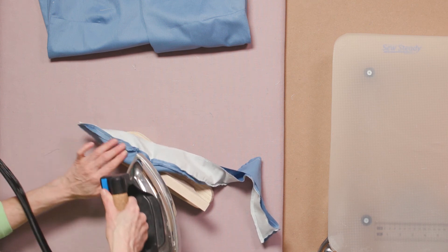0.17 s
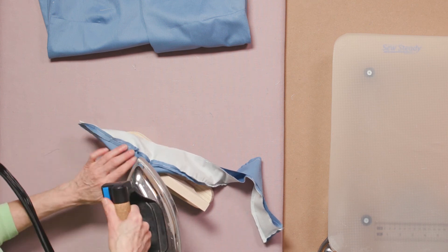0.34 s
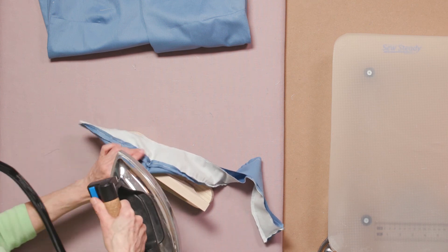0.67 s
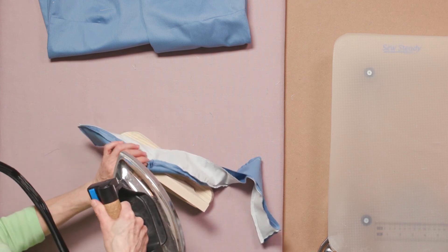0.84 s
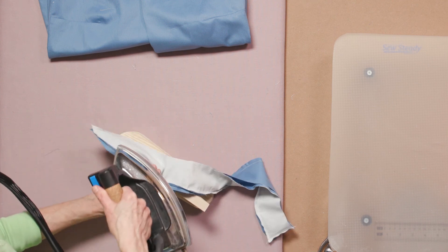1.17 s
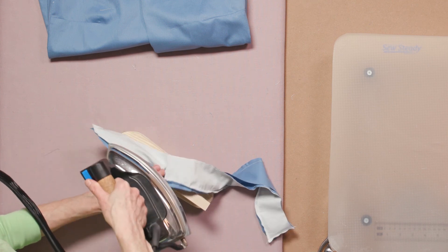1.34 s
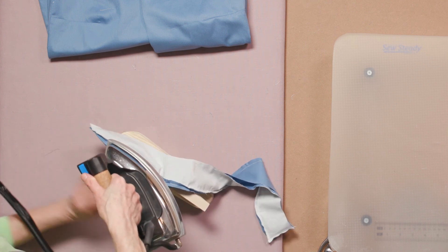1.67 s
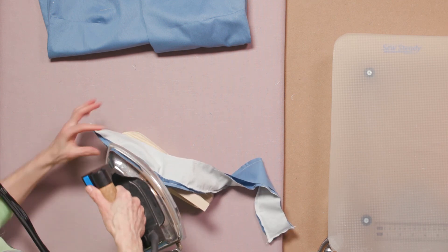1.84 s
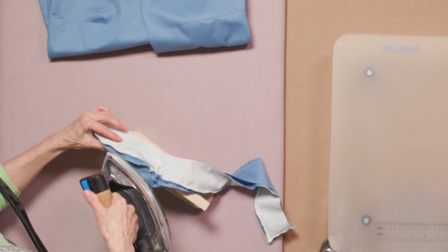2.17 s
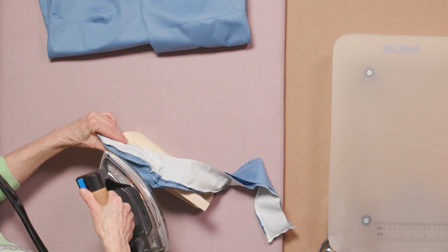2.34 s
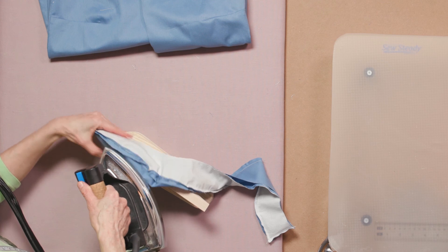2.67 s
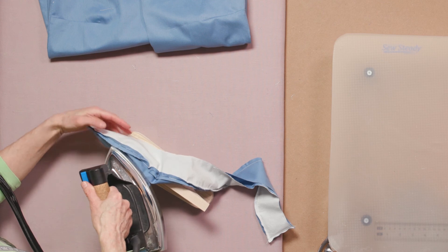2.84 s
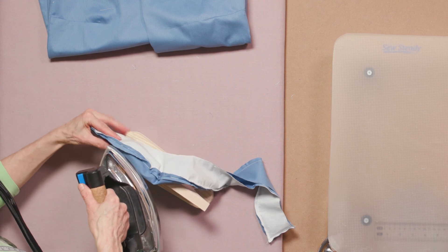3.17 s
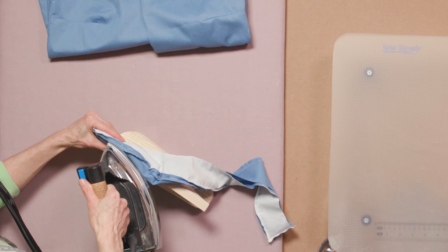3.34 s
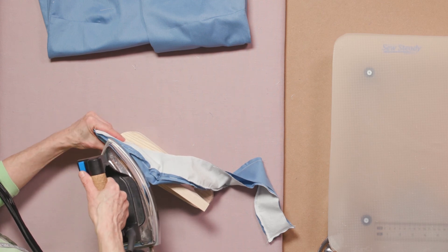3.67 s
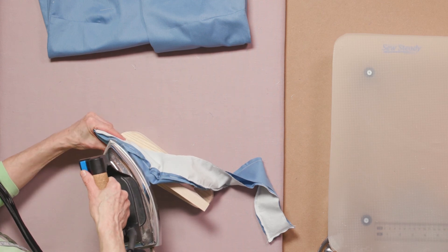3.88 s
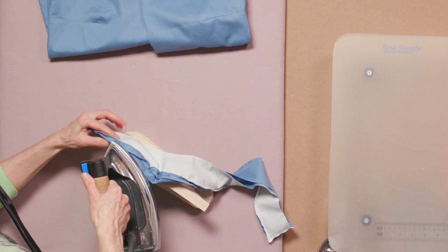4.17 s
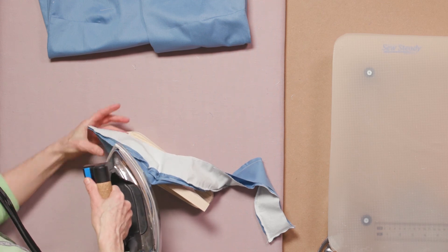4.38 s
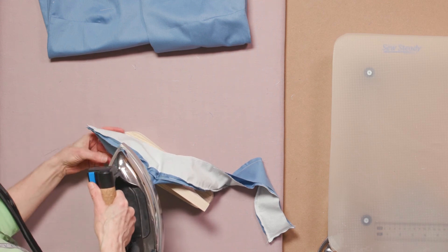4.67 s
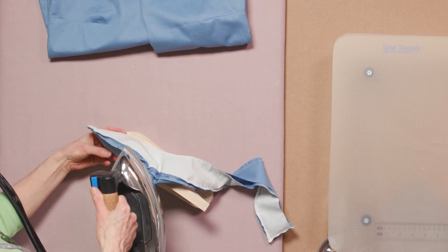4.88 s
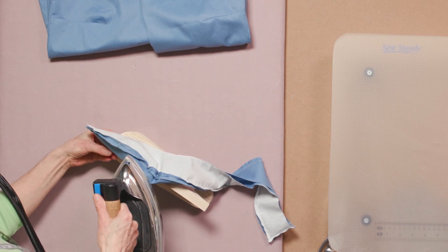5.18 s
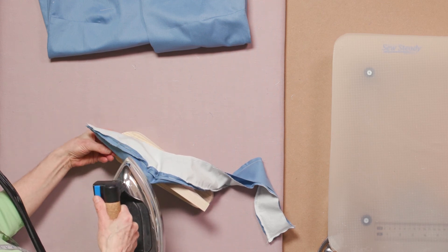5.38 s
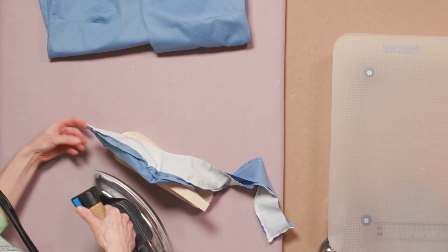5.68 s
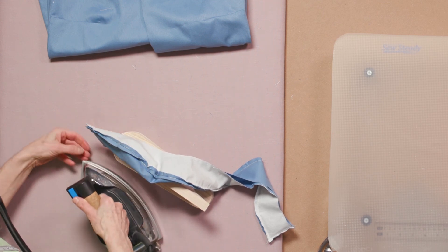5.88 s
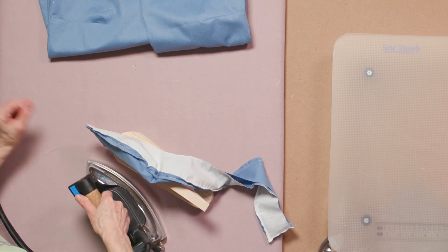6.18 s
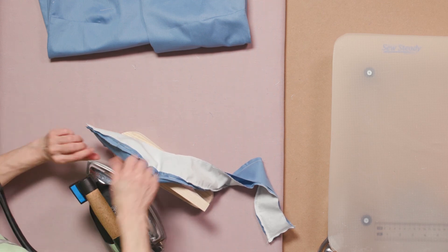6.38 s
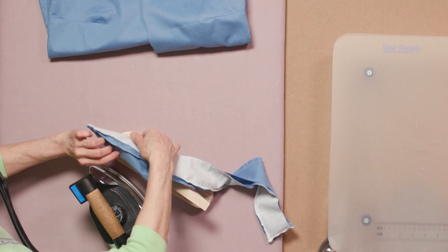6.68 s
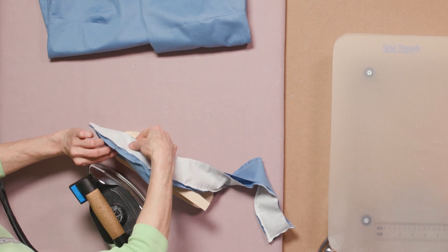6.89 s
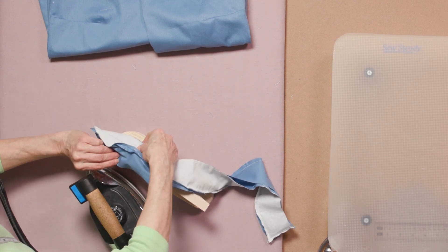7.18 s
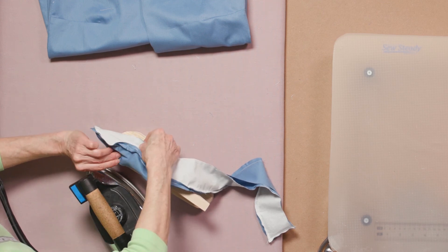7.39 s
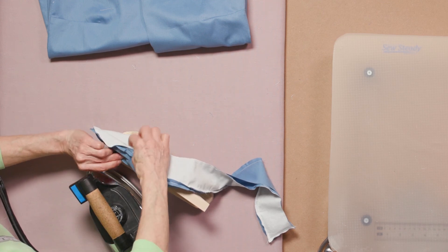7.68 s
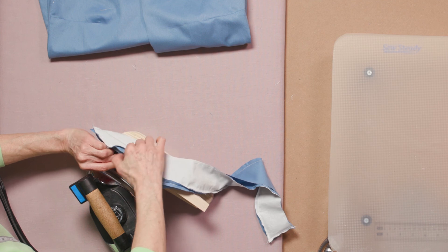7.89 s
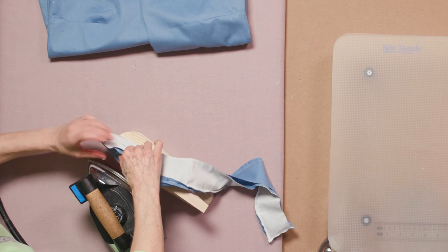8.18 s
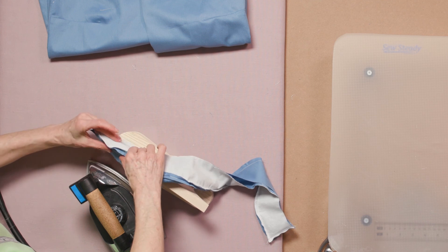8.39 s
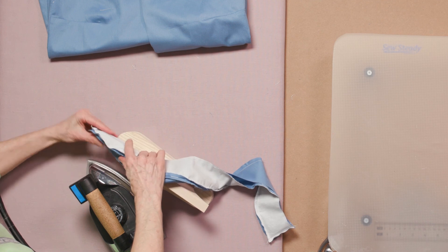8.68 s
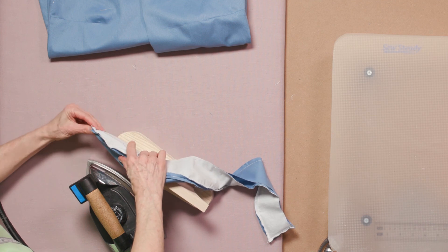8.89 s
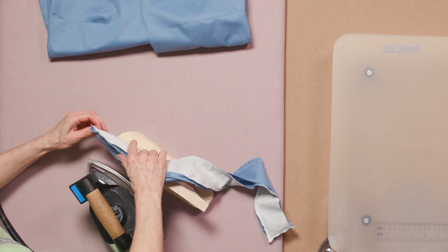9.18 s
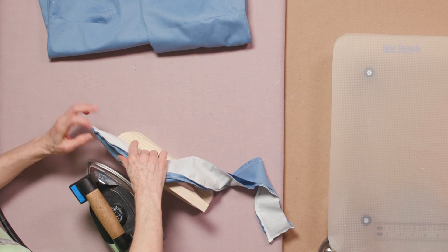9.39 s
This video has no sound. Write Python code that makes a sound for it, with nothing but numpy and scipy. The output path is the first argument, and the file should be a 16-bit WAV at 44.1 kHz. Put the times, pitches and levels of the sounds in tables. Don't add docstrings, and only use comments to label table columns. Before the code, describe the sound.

Fingers and a hand iron softly rub cloth on a padded form, with light ticks and one heavy set-down clunk, over a low steady hum.

```python
import sys
import numpy as np
from scipy import signal
from scipy.fft import rfft, irfft
from scipy.io import wavfile
from scipy.ndimage import uniform_filter1d

SR = 44100
rng = np.random.default_rng(int(sys.argv[2]) if len(sys.argv) > 2 else 0)


def bounce(signal):
    frames = np.transpose(np.atleast_2d(signal))
    limited = np.clip(frames, -1, 1)
    pcm = np.round(limited * 32767).astype(np.int16)
    wavfile.write(sys.argv[1], SR, pcm)


def how_loud(loudness_db):
    steps = np.asarray(loudness_db, float) / 20
    return 10 ** steps


N = 420273
TIME = np.arange(N) / SR

# [f/Hz, spectral density level/dB]
FIBRE_SPECTRUM = [(290, -9), (500, -6), (640, -10), (1160, -7), (1260, -12.5), (1530, -6), (1670, -11.5),
                  (4600, -9), (8700, -6), (16000, -12)]
# [peak t/s, rise t/s, fall t/s, rustle level/dB]
FINGERS = [(.0, .01, 0.081, -66.5), (.09, .06, 0.07, -68.5), (.28, 0.076, 0.071, -67),
           (.37, .05, 0.067, -69.5), (.46, 0.097, 0.12, -66), (.61, 0.045, 0.038, -67.5),
           (.84, 0.063, 0.05, -70), (2.07, 0.055, .04, -74), (2.215, 0.027, 0.022, -71),
           (6.93, 0.085, 0.12, -68.5), (7.21, 0.096, 0.072, -60.5), (7.31, 0.042, 0.065, -62),
           (7.435, .03, 0.024, -68.5), (7.57, 0.11, .1, -74), (7.635, 0.028, 0.018, -63.5),
           (7.71, 0.038, 0.034, -67.5), (7.79, .05, 0.056, -69), (7.89, 0.023, .03, -71),
           (8.0, 0.085, 0.044, -76), (8.07, 0.041, 0.058, -66), (8.34, 0.019, .05, -72),
           (8.4, .04, .04, -71), (8.54, 0.095, 0.093, -69), (8.68, 0.046, 0.064, -65),
           (9.02, .05, 0.069, -90), (9.3, 0.24, 0.2, -76)]
# [peak t/s, rise t/s, fall t/s, rustle level/dB]
IRON = [(.92, 0.032, .04, -65.5), (1.0, 0.1, 0.11, -61.5), (1.08, 0.068, 0.079, -61.5),
        (1.2, 0.08, 0.19, -69), (1.46, 0.059, 0.15, -66), (1.54, 0.083, 0.079, -68.5),
        (1.88, 0.025, 0.13, -72.5), (2.33, 0.034, .04, -67), (2.39, .03, 0.072, -70),
        (2.59, 0.086, 0.15, -67.5), (2.77, 0.026, 0.038, -70.5), (2.86, 0.08, 0.058, -72.5),
        (3.24, 0.055, 0.086, -69), (3.35, 0.052, 0.044, -64), (3.525, .015, .04, -70.5),
        (3.67, .035, .05, -68), (3.96, 0.033, 0.027, -79), (4.12, 0.086, 0.18, -75),
        (4.34, .025, .025, -70.5), (4.41, .02, 0.024, -71), (4.5, 0.031, .03, -70),
        (4.55, 0.046, 0.047, -67), (4.69, .02, 0.024, -79), (6.327, 0.017, 0.019, -62),
        (6.362, 0.0094, 0.013, -59.5), (6.385, .02, 0.025, -66)]
# [peak t/s, rise t/s, fall t/s, rustle level/dB]
PAD = [
    (5.25, .07, 0.19, -75),
    (5.67, 0.023, 0.12, -70),
    (5.78, .05, .05, -73.5),
    (5.87, 0.077, 0.061, -67),
    (5.97, .02, .04, -67),
    (6.05, .04, 0.047, -63),
    (6.2, 0.12, 0.13, -73),
    (6.82, 0.013, 0.031, -63),
    (6.78, 0.072, .04, -70),
]
# [peak t/s, rise t/s, fall t/s, rustle level/dB]
LINING = [
    (.105, 0.014, .015, -70),
    (8.735, 0.048, 0.047, -69),
    (8.8, .04, 0.087, -74),
]


def sliding():
    grains = rng.standard_normal(N) + 0.73 * slips(1500, scatter_db=1.5)
    rustle = colour(grains, FIBRE_SPECTRUM) * how_loud(0.79 * walk(30))
    high_pass = signal.butter(2, 8800, "high", fs=SR, output="sos")
    fine = signal.sosfiltfilt(high_pass, rustle)
    coarse = rustle - fine
    surfaces = ((FINGERS, -1.2), (IRON, -3), (PAD, -21), (LINING, 3.5))
    creep = how_loud(-85.5 + 3 * walk(6))
    coarse_gain = np.sqrt(sum(strokes(table) ** 2 for table, _ in surfaces) + creep ** 2)
    fine_gain = np.sqrt(sum(strokes(table, fine_db) ** 2 for table, fine_db in surfaces) + creep ** 2)
    return how_loud(6.5) * coarse_gain * coarse + how_loud(6.0) * fine_gain * fine


# [peak t/s, rise t/s, fall t/s, ring level/dB, contact place 0-3]
DRAG = [(.01, .02, .04, -71, 0.11), (.47, 0.14, .12, -76, 2.1), (.61, 0.05, .04, -70, 2.06),
        (.98, 0.065, .05, -71.5, .95), (1.06, 0.063, 0.047, -68, 1.0), (1.29, 0.041, 0.044, -76, 0.3),
        (1.5, 0.028, 0.046, -72, 1.1), (2.33, .03, .04, -72, 0.48), (2.4, 0.037, .04, -74.5, .5),
        (2.58, 0.038, 0.11, -66, 0.5), (2.68, 0.04, 0.05, -70, .6), (2.78, .07, .09, -72, .5),
        (2.915, .02, .015, -73, 1.1), (2.895, 0.025, .012, -68, 0.27), (3.23, 0.026, 0.088, -71, 0.54),
        (3.35, .05, .04, -65.5, 0.51), (3.53, .025, .05, -70.5, 0.48), (3.67, 0.031, 0.043, -69, .7),
        (3.96, .03, 0.026, -77, .3), (4.14, .05, 0.05, -77, 0.092), (4.345, .025, 0.022, -76, .1),
        (4.397, 0.008, 0.016, -66, 0), (4.52, 0.044, 0.033, -75, .9), (4.98, .03, 0.036, -73, 0),
        (5.12, .04, .05, -73, 0), (5.23, .05, .025, -73, 0)]
# [peak t/s, rise t/s, fall t/s, ring level/dB, contact place 0-3]
NUDGE = [(.05, 0.098, 0.045, -73, 3.0), (6.818, .005, 0.034, -60.5, 1.9), (6.87, .015, 0.03, -69, 0.0),
         (6.925, 0.04, 0.035, -66, 0.3), (6.93, 0.03, 0.025, -68, 2.5), (7.0, .04, 0.067, -73, 0.5),
         (7.2, .03, .04, -71, .2), (7.205, .015, .015, -70, 2.0), (7.78, .04, .03, -73, 2.7),
         (8.068, .03, .03, -70, 3.0), (8.07, .05, .06, -75, .9), (8.57, .035, .04, -76, 3.0),
         (8.35, .02, .05, -79, 1.5), (8.5, .015, .04, -73, 2), (8.68, 0.038, 0.041, -66.5, 1.3),
         (8.67, .03, .08, -70, 0.0), (8.84, .03, .02, -77, 1.0)]
# [peak t/s, rise t/s, fall t/s, ring level/dB]
HEEL = [(.93, .04, .04, -82), (1.05, .08, .1, -75), (.02, .03, .04, -66), (2.77, 0.03, .04, -75),
        (3.25, 0.03, .04, -69), (3.36, .04, .04, -76), (3.68, 0.035, .04, -70), (4.52, 0.048, .05, -76),
        (6.93, 0.042, 0.054, -69), (7.78, .03, .03, -83), (8.68, .04, .05, -74)]
# [peak t/s, rise t/s, fall t/s, ring level/dB]
RIM = [(.38, .04, .12, -83), (.5, .05, .05, -86), (.63, .04, .02, -76), (1.03, .1, .08, -72),
       (2.33, .03, .04, -77), (2.77, .05, .08, -80), (2.57, .04, .05, -74), (2.66, .03, .04, -74),
       (2.89, .02, .02, -74), (3.25, .05, .06, -76), (3.37, .05, .04, -77), (3.68, .04, .04, -81),
       (8.69, .03, .05, -79)]
# [f/Hz, width f/Hz, level/dB]
PLATE = [
    [(1490, 20, 0), (1560, 120, -14)],
    [(2080, 45, 0), (2420, 80, -11)],
    [(3770, 60, 0), (4100, 500, -13), (8900, 400, -10)],
    [(4670, 110, 0), (4850, 300, -9)],
]
# [f/Hz, width f/Hz, level/dB]
HEEL_MODE = [(1158, 35, 0)]
# [f/Hz, width f/Hz, level/dB]
RIM_MODE = [(3790, 50, 0)]
RING_PLACE = (0.85, 3.35, 2, 0.11)
RING_DB = (0.45, -0.47, -0.39, 0.65)
RING_FADE_DB = (11, 6.8, 5.5, 6.8)
RING_FLUTTER_DB = (1.7, 2.2, 2.2, 2.2, 1.5, 1.8)


def dragging():
    contacts = np.vstack([DRAG, NUDGE])
    gains = []
    for place, db, fade_db in zip(RING_PLACE, RING_DB, RING_FADE_DB):
        loss_db = fade_db * (contacts[:, 4] - place) ** 2
        gains.append(strokes(contacts, db - loss_db))
    gains += [strokes(HEEL), strokes(RIM)]
    out = np.zeros(N)
    for modes, gain, flutter_db in zip(PLATE + [HEEL_MODE, RIM_MODE], gains, RING_FLUTTER_DB):
        ring = steady(unit(body(rng.standard_normal(N), modes)), 0.048)
        out += gain * ring * how_loud(flutter_db * walk(90))
    return out


# [peak t/s, rise t/s, fall t/s, level/dB, f/Hz]
SING = [
    (6.83, .015, 0.051, -62.5, 1494),
    (6.92, 0.036, .05, -70, 1494),
    (7.0, .04, .07, -68, 1494),
    (6.93, .04, 0.028, -70, 2090),
    (6.98, .015, .015, -74, 2080),
    (7.005, .015, .02, -70, 4690),
    (7.045, .015, .02, -76, 5300),
    (7.205, .015, .015, -68, 4690),
    (8.68, .04, .04, -69, 1494),
    (.05, .06, .05, -74, 2090),
]


def singing():
    waver = np.cumsum(1 + 0.00207 * walk(40)) / SR
    flutter = how_loud(1.4 * walk(60))
    lines = sum(np.sqrt(2) * strokes([row]) * np.sin(2 * np.pi * row[4] * waver) for row in SING)
    return flutter * lines


# [peak t/s, rise t/s, fall t/s, level/dB]
SCUFF = [
    (6.818, .005, 0.033, -58),
]
# [f/Hz, width f/Hz, level/dB]
EDGE = [(2400, 500, -6), (3700, 500, 1), (4300, 500, -1.5)]


def scuffing():
    return scrape(EDGE, SCUFF)


# [peak t/s, rise t/s, fall t/s, level/dB]
TAUT = [
    (1.28, .04, .04, -76),
    (1.45, .04, .05, -67),
    (1.52, .04, .05, -72),
    (1.06, .06, .05, -68),
    (7.22, .03, .04, -66),
    (7.435, .02, .02, -71),
    (1.75, .05, .06, -77),
]
# [f/Hz, width f/Hz, level/dB]
WEAVE = [(6600, 300, 0), (7300, 270, -2), (8500, 500, -4)]


def whispering():
    return scrape(WEAVE, TAUT)


# [f/Hz, peak level/dB, t60 t/s, sign]
SNAP_SOFT = [(2100, -54, .009, 1), (3750, -48, .007, 1), (4400, -50, .004, -1), (5020, -47.5, .008, 1),
             (5900, -58, .006, 1)]
# [f/Hz, peak level/dB, t60 t/s, sign]
SNAP_HARD = [(2100, -48, .007, 1), (3000, -42, .004, 1), (3850, -45, .005, -1), (5800, -42, .004, -1),
             (7100, -36, .003, -1), (8700, -42, .003, 1), (10400, -45, .0035, 1), (12700, -49, .003, 1)]


def snaps():
    out, t = np.zeros(N), TIME[:SR // 20]
    for s, modes in ((1.5813, SNAP_SOFT), (1.8587, SNAP_HARD)):
        onset = 1 - np.exp(-t / 0.000056)
        ring = sum(sign * how_loud(db) * np.sin(2 * np.pi * hz * t) * decay(t, t60) for hz, db, t60, sign in modes)
        add(out, s, ring * onset)
    return out


# [t/s, peak level/dB, low f/Hz, high f/Hz, high share level/dB]
TICKS = [(0.048, -49, 2100, 8720, -2), (0.4385, -45, 1500, 6000, 9), (1.23, -49, 3200, 7470, 4),
         (1.2672, -53, 4700, 8500, 4), (1.3031, -48, 4700, 8500, 4), (1.8244, -52, 2530, 5500, 8),
         (1.865, -55, 2800, 7000, 10), (3.2108, -49, 1454, 5620, 15), (4.3899, -56, 1580, 5050, 16),
         (5.904, -47, 6500, 9500, 10), (5.9602, -51, 3500, 6000, 2), (5.9723, -47, 5000, 8000, 8),
         (6.0647, -43, 2200, 4930, -16), (6.3205, -39, 4300, 8300, 6), (6.3276, -33.5, 4400, 8300, 14),
         (6.3427, -41, 1550, 7630, 14), (6.3576, -47, 1400, 6970, 9), (6.3663, -38, 1490, 8000, 18),
         (6.3703, -37, 1497, 10400, 17), (6.726, -44, 2000, 4400, -9), (7.25, -45, 4500, 9000, 8),
         (6.8145, -51, 3300, 8430, -6), (8.329, -52, 1980, 7250, 17), (9.39, -44.5, 3150, 8040, 12)]


def ticks():
    out, t = np.zeros(N), TIME[:SR // 10]
    noises = rng.standard_normal((len(TICKS), len(t)))
    for (s, db, low_hz, high_hz, high_db), noise in zip(TICKS, noises):
        strike = (t == 0) + how_loud(-16) * noise * decay(t, 0.011)
        low = band(band(strike, low_hz, 0.5 * low_hz), low_hz, 1.0 * low_hz)
        high = band(band(strike, high_hz, 0.71 * high_hz), high_hz, 0.72 * high_hz)
        crack = 3 * low - how_loud(high_db) * high
        add(out, s + 0.00067, how_loud(db) * crack / abs(crack).max())
    return out


# [t/s, peak level/dB, f/Hz, t60 t/s]
PATS = [
    (0.048, -47, 490, 0.018),
    (0.122, -55, 760, 0.02),
    (0.292, -52, 751, 0.025),
    (0.371, -49, 573, 0.025),
    (0.391, -54, 490, 0.02),
    (0.415, -48.5, 600, 0.025),
    (0.438, -47, 606, 0.025),
    (0.464, -52, 452, 0.028),
    (0.509, -65, 482, 0.014),
    (5.887, -62, 468, 0.03),
]


def pats():
    return mode_pairs(PATS, push_s=0.00064, spread=1.28)


# [t/s, peak level/dB, f/Hz, t60 t/s]
CLACKS = [(0.0014, -51, 1154, 0.054), (0.392, -57, 1100, .015), (0.414, -57, 1000, .015),
          (0.439, -54, 1500, .015), (6.3215, -49, 1450, 0.027), (6.328, -46, 1600, 0.027),
          (6.343, -54, 1500, .04), (6.378, -49, 1480, .06), (0.3194, -51, 1580, 0.016),
          (0.344, -55, 1740, 0.03), (4.6896, -59, 1130, 0.028), (4.69, -63, 2490, 0.035),
          (5.6665, -58, 2510, 0.046), (6.0327, -49, 1420, 0.023), (6.3692, -40.5, 1524, 0.037),
          (6.7262, -46, 1150, 0.018), (4.503, -58, 1200, .03), (4.508, -58, 2100, .02),
          (6.814, -52, 1494, 0.086), (8.488, -58, 2000, 0.05)]


def clacks():
    return mode_pairs(CLACKS, push_s=0.00056, spread=0.76)


# [t/s, peak level/dB, f/Hz, t60 t/s]
KNOCKS = [
    (6.066, -31, 270, 0.021),
    (6.329, -47, 346, 0.083),
    (6.369, -37, 343, 0.06),
    (6.372, -49.5, 685, 0.057),
]


def knocks():
    return mode_pairs(KNOCKS, push_s=0.0019, spread=1.2)


# [peak t/s, rise t/s, fall t/s, level/dB]
RATTLE = [
    (5.71, .04, .05, -71),
    (6.058, 0.16, 0.069, -71.5),
    (6.19, 0.023, 0.095, -72.5),
    (6.322, 0.0028, 0.02, -59.5),
    (6.368, .004, 0.02, -54),
    (6.386, .01, 0.018, -58),
    (6.41, .03, .05, -71),
]
# [f/Hz, width f/Hz, level/dB]
SHELL = [(1150, 200, -4.5), (1400, 94, 2), (1580, 130, -2.5), (1740, 100, -1), (3300, 840, -12)]


def rattling():
    return scrape(SHELL, RATTLE)


# [peak t/s, rise t/s, fall t/s, level/dB]
GRIT = [
    (6.359, 0.0032, .006, -55),
    (6.367, .003, .003, -48.5),
    (6.370, .002, 0.0036, -49.5),
    (6.385, .01, .025, -61),
]
# [f/Hz, width f/Hz, level/dB]
GRAIN = [(3420, 1500, -6), (6900, 1700, -1), (8700, 1300, 1), (10800, 2000, -5)]


def crunching():
    return unit(body(slips(4000, scatter_db=1.5), GRAIN)) * strokes(GRIT)


# [peak t/s, rise t/s, fall t/s, level/dB]
SHIFT = [
    (7.26, .1, .12, -73),
    (8.497, 0.013, .05, -56.5),
    (8.56, 0.047, 0.052, -56.5),
    (8.64, .04, 0.066, -63.5),
    (8.72, 0.055, 0.062, -67.5),
]
# [f/Hz, width f/Hz, level/dB]
FORM = [(490, 40, -1.5), (581, 39, 4), (765, 83, -7), (860, 48, -6), (1950, 71, -16)]


def shifting():
    return scrape(FORM, SHIFT)


# [f/Hz, rms level/dB]
MOTOR = [(86.67, -50), (120.0, -64.5)]


def motor():
    return tones(MOTOR, drift_db=0.27)


# [f/Hz, width f/Hz, rms level/dB]
FAN = [(176.5, 2.5, -70), (234.8, 0.78, -68), (294.5, 2.5, -72.5), (356.6, 16, -79), (435.3, 14, -81.5)]


def fan():
    return sum(how_loud(db) * steady(unit(band(rng.standard_normal(N), hz, w)), 0.25) for hz, w, db in FAN)


# [f/Hz, spectral density level/dB]
AIR = [(5.9, -27), (10, -17), (38, -14), (60, -12.5), (92, -18.5), (111, -10), (138, -9.5), (240, -14.5),
       (394, -25.5), (570, -28.5), (1530, -35), (2360, -38.5), (12100, -43), (16000, -43)]


def air():
    return how_loud(-60.5) * colour(rng.standard_normal(N), AIR)


# [delay t/s, half width t/s, sign, peak level/dB]
THUMP = [
    (0, 0.009, -0.82, -36.5),
    (.064, .013, 0.77, -34),
    (.085, .016, 1, -51),
    (.16, 0.042, -0.67, -46),
]
# [f/Hz, rms level/dB]
RIPPLE = [(7.7, -65), (15.4, -73), (23.1, -99)]


def supply():
    first_s, every_s = 0.153, 3.0647
    since = (TIME - first_s + 1) % every_s - 1
    thump = sum(sign * how_loud(db) * np.exp(-.5 * ((since - d) / w) ** 2) for d, w, sign, db in THUMP)
    return thump + tones(RIPPLE, drift_db=3.5)


def strokes(table, more_db=0):
    edge_db, roundness = 10, 1.37
    power = np.zeros(N)
    for (s, rise, fall, db, *_), extra_db in zip(table, np.broadcast_to(more_db, len(table))):
        span = slice(max(int((s - 5 * rise) * SR), 0), int((s + 5 * fall) * SR))
        away = np.maximum((s - TIME[span]) / rise, (TIME[span] - s) / fall)
        power[span] += how_loud(db + extra_db - edge_db * away ** roundness) ** 2
    return np.sqrt(power)


def scrape(modes, table):
    noise = steady(unit(body(rng.standard_normal(N), modes)), 0.08)
    return noise * how_loud(0.82 * walk(50)) * strokes(table)


def mode_pairs(table, push_s, spread):
    out, t = np.zeros(N), TIME[:SR // 4]
    for s, db, hz, t60 in table:
        pair = np.sin(2 * np.pi * hz * t) + 0.064 * np.sin(2 * np.pi * hz * spread * t)
        push = 1 - np.exp(-t / push_s)
        add(out, s, how_loud(db) * 0.69 * pair * push * decay(t, t60))
    return out


def decay(t, t60):
    return 1000 ** (-t / t60)


def slips(per_s, scatter_db):
    happens, side, size = rng.random((3, N))
    sizes = how_loud(-scatter_db * np.log(size + 0.02))
    return unit((happens < per_s / SR) * (side - .5) * sizes)


def tones(table, drift_db):
    out = np.zeros(N)
    for hz, db in table:
        level = how_loud(db + drift_db * walk(2.1))
        out += level * np.sqrt(2) * np.sin(2 * np.pi * (hz * TIME + rng.random()))
    return out


def steady(x, hold_s):
    return unit(x / np.sqrt(uniform_filter1d(x ** 2, int(hold_s * SR)) + 0.13))


def walk(rate):
    k = int(SR / rate)
    held = np.repeat(rng.standard_normal(N // k + 1), k)
    return unit(uniform_filter1d(uniform_filter1d(held, k), k)[:N])


def body(x, modes):
    return sum((-1) ** k * how_loud(db) * band(x, hz, w) for k, (hz, w, db) in enumerate(modes))


def band(x, hz, width):
    return signal.lfilter(*signal.iirpeak(hz, hz / width, fs=SR), x)


def colour(x, points):
    hz, db = np.transpose(points)
    f = np.maximum(np.arange(N // 2 + 1) * SR / N, 1)
    gain = how_loud(np.interp(np.log(f), np.log(hz), db))
    return unit(irfft(rfft(x) * gain, N))


def unit(x):
    return x / np.sqrt(np.mean(x ** 2))


def add(out, s, burst):
    i = int(s * SR)
    out[i:i + len(burst)] += burst[:N - i]


def scene():
    close = sliding() + dragging() + singing() + scuffing() + whispering() + snaps() + ticks()
    close = close + pats() + clacks() + knocks() + rattling() + crunching() + shifting()
    t = TIME[:SR // 3]
    tail = rng.standard_normal(len(t)) * decay(t, 0.21) * (t > .004)
    wet = signal.fftconvolve(close, tail / np.sqrt(np.sum(tail ** 2)))[:N]
    background = motor() + fan() + air() + supply()
    return (close + how_loud(-12.5) * wet + background)[None]


def low_pass(x):
    return signal.sosfilt(signal.butter(12, 16300, fs=SR, output="sos"), x)


def record(dry):
    top_hz = 15730
    passed = np.arange(N // 2 + 1) * SR / N < top_hz
    mix = irfft(rfft(dry) * passed, N)
    return low_pass(mix)


dry = scene()
out = record(dry)
bounce(out)
```